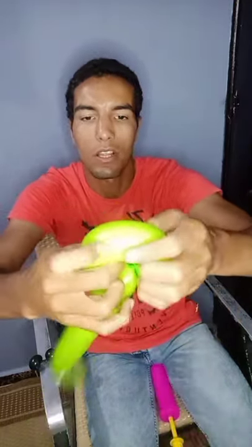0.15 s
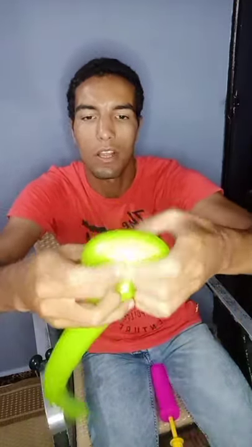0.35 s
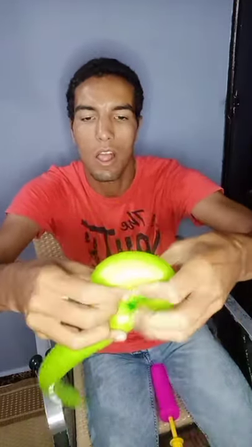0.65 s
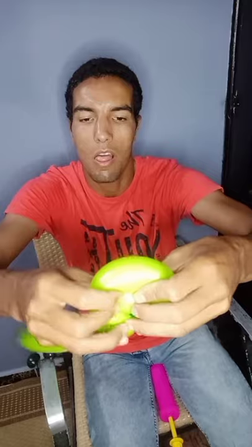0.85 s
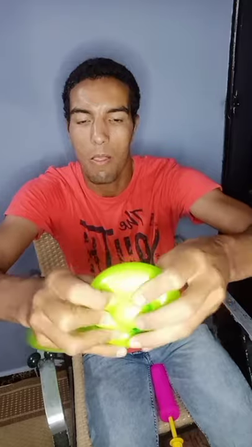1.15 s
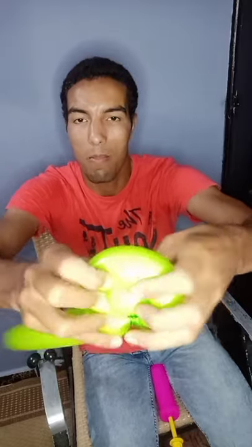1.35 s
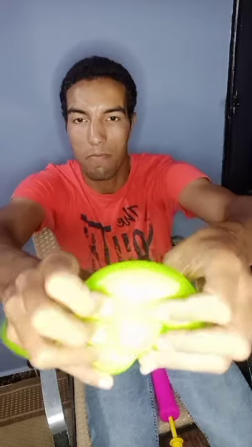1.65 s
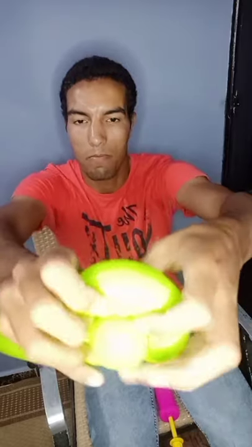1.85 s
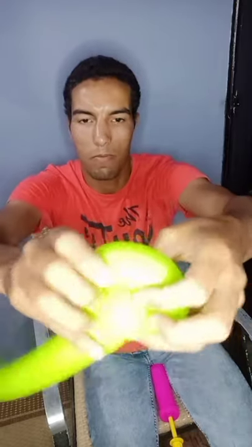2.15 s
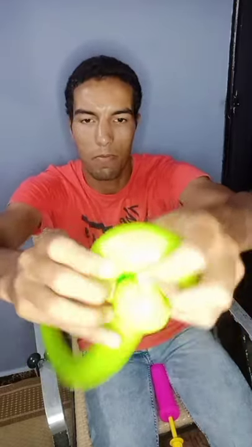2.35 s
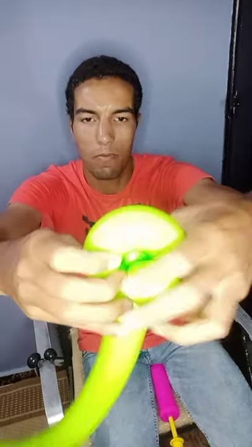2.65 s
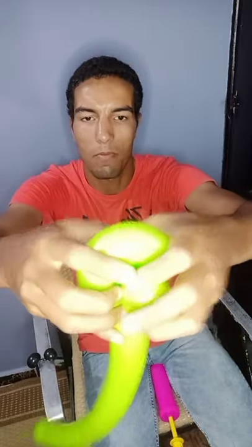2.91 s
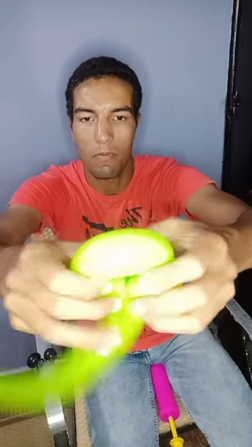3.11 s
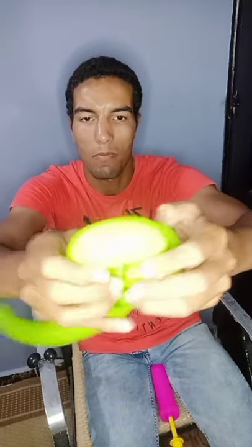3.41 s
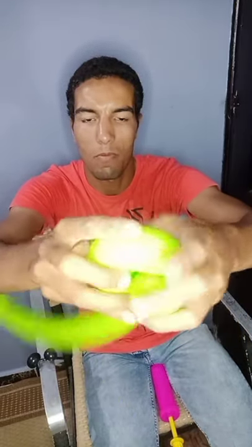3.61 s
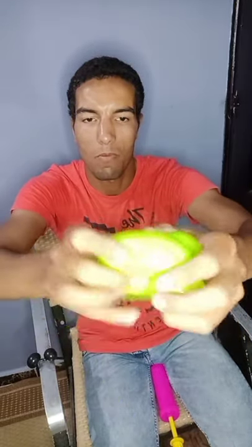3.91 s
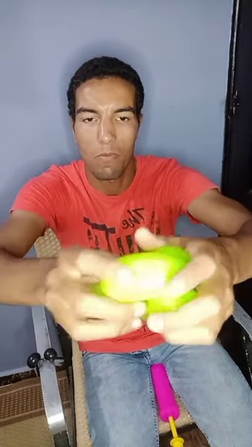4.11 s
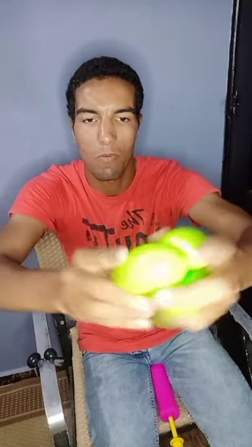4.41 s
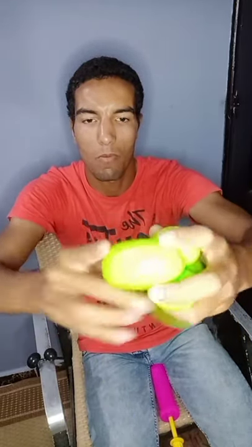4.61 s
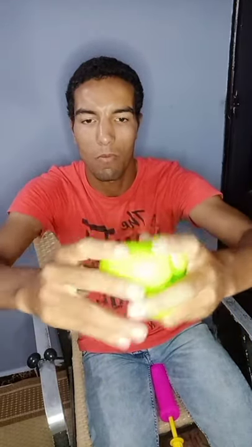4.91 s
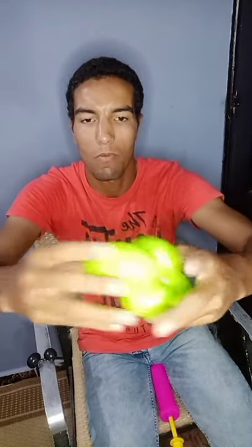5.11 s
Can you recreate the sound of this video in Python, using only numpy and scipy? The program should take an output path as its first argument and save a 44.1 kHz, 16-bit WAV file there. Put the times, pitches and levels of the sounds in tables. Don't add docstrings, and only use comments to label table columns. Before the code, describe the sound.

Hands twist a stretchy latex balloon up close: a quick rising squeak, rubbery rubbing, then sharp snaps, hollow pops and scuffs in a small room.

```python
import sys
import numpy as np
from scipy import signal
from scipy.fft import rfft, irfft, next_fast_len
from scipy.io import wavfile
from scipy.ndimage import map_coordinates

SR = 44100
rng = np.random.default_rng(int(sys.argv[2]) if len(sys.argv) > 2 else 0)


def nominal_scale(level):
    x = np.asarray(level, float) / 20
    return 10 ** x


def inscribe(sig):
    pcm = np.round(np.clip(np.atleast_2d(sig).T, -1, 1) * 32767)
    wavfile.write(sys.argv[1], SR, pcm.astype(np.int16))


N = 231921

# time in seconds, pressure in dB, sliding speed in dB.
HANDS = [(0, -33, -53.5), (.36, -45, -64.5), (.84, -42, -66.5), (1.12, -47, -65), (1.29, -42, -106),
         (1.42, -60, -61.5), (1.52, -54, -49.5), (1.74, -32, -48), (2.12, -42.5, -60), (2.32, -37.5, -46.5),
         (2.6, -35.5, -60.5), (2.94, -40, -60), (3.1, -37.5, -60), (3.55, -36.5, -68), (4.1, -46, -78),
         (4.44, -31.5, -47), (4.66, -40.5, -71), (5.26, -55, -65)]


def along(points, hz):
    f, v = np.transpose(points)
    return np.interp(np.log(hz + 1), np.log(f + 1), v)


def coloured(x, points):
    m = 2 * next_fast_len(N // 2 + 4096)
    gain = nominal_scale(along(points, np.fft.rfftfreq(m, 1 / SR)))
    cepstrum = irfft(np.log(gain + 1e-6), m)
    cepstrum[1:m // 2] *= 2
    cepstrum[m // 2 + 1:] = 0
    return irfft(rfft(x, m) * np.exp(rfft(cepstrum)), m)[..., :N]


def slips(s, db, drum_db, crack_db, drum_hz, skin_hz, luck, size, alike=0):
    index = np.floor(s * SR).astype(int)[:, None] + np.arange(size)
    # Hz, level in dB, seconds to fade by 60 dB
    modes = [(drum_hz, db + drum_db, 4 / drum_hz),
             (skin_hz, db - 4.5, 0.0036 + 0 * s),
             (2100 * np.exp(0.597 * luck[:, 0]), db - 6.5, 0.0032 + 0 * s),
             (5000 * np.exp(0.068 * luck[:, 1]), db + np.minimum(crack_db, 0) - 4.0, 0.0031 + 0 * s)]

    grit = rng.standard_normal((2, len(s), size))
    grit = alike * grit[:, :1] + np.sqrt(1 - alike ** 2) * grit
    bright = nominal_scale(0.59 * np.clip(crack_db, -20, 20) - 20 + 0 * s)[:, None]
    grit = grit + bright * np.diff(grit, n=2, axis=2, prepend=0, append=0)
    grit[1] = .6 * np.roll(grit[0], -1, axis=1) + .8 * grit[1]

    out = np.zeros((2, 2, N))
    for ear, side in enumerate((1, -1)):
        lag = 1e-4 + side * (2.2e-5 + 4.6e-5 * luck[:, 6])
        t = np.maximum(index / SR - (s + lag)[:, None], 0)
        soft = 1 - np.exp(-t / 0.00014)
        ring = 0
        for k, (hz, level_db, t60) in enumerate(modes):
            shade_db = side * 3.21 * np.log2(1 + hz / 900) * (np.tanh(luck[:, 7 + k]) - .15)
            fade = nominal_scale((level_db + shade_db)[:, None] - 60 * t / t60[:, None])
            ring = ring + fade * np.sin(2 * np.pi * hz[:, None] * t)
        ring = ring * np.sign(luck[:, 15:16])
        crack_level_db = db + crack_db + 3 + side * (1.14 * luck[:, 5] - 0.86)
        crack = nominal_scale(crack_level_db[:, None] - 60 * t / 0.0083) * grit[ear]
        for kind, wave in enumerate((ring, crack)):
            out[kind, ear] = np.bincount(index.ravel(), (wave * soft).ravel(), N + SR)[:N]
    return out


def hush():
    # Hz, noise level in dB per Hz.
    hush_colour = [(20, -16), (42, -11.5), (62, -18.5), (130, -10.5), (300, -23), (1000, -16), (2500, -40),
                   (6000, -42), (16000, -38)]
    noise = rng.standard_normal((3, N))
    noise = coloured(noise[0] + 0.36 * noise[1:], hush_colour)
    return nominal_scale(-61) * noise / np.std(noise)


def rub():
    luck = rng.standard_normal((3600, 20))
    clump = np.repeat(rng.uniform(0, N / SR, 1200), 3)
    s = np.clip(clump + .004 * np.abs(luck[:, 16]), 0, N / SR)
    at, pressure_db, speed_db = np.transpose(HANDS)
    db = np.interp(s, at, pressure_db)
    speed_db = np.interp(s, at, speed_db)
    skid_db = speed_db - db
    hiss_db = -9.5 + 0.22 * (skid_db - np.mean(skid_db))
    size_db = -2 + 1.4 * luck[:, 17]
    drum_hz = 720 * np.exp(0.38 * luck[:, 18])
    skin_hz = 2300 * np.exp(0.13 * luck[:, 19])
    return slips(s, db + size_db, -2.5, hiss_db + 0.3 * luck[:, 14], drum_hz, skin_hz, luck, size=224)


def slide():
    at, _, speed_db = np.transpose(HANDS)
    flutter = map_coordinates(rng.standard_normal(N // 300 + 2), [np.arange(N) / 300], order=1)
    noise = rng.standard_normal((3, N))
    level_db = np.interp(np.arange(N) / SR, at, speed_db) + 15.5 + 5.8 * flutter
    return nominal_scale(level_db) * (0.18 * noise[0] + 0.8 * noise[1:])


def scuffs():
    # start in seconds, length in seconds, level in dB,
    # drum level in dB beside that.
    scuff_rows = [(.416, 0.0042, -35.5, 0.5), (.479, 0.0032, -38, -5), (.55, 0.013, -32.5, -1),
                  (.693, 0.023, -43, 5.5), (.765, 0.012, -55, 6), (.795, 0.048, -39, 0.5),
                  (.879, .005, -39, -12), (1.132, 0.021, -33, -12), (1.405, .012, -54, -4),
                  (1.5, 0.06, -25, -5.5), (1.595, 0.0048, -31, 4), (1.624, 0.0085, -20.5, -16),
                  (1.655, 0.013, -18, -14), (1.748, 0.015, -17, -5.5), (1.79, 0.0078, -36, -3),
                  (1.808, 0.0053, -23.5, -7.5), (1.852, 0.019, -29, -4), (1.887, 0.0046, -23, -19),
                  (1.9, 0.0067, -31, -14), (1.954, 0.014, -30, -20), (1.988, 0.008, -41.5, 1),
                  (2.003, 0.0045, -33, -16), (2.031, 0.0028, -47, -13), (2.042, 0.0037, -34.5, -1.5),
                  (2.071, 0.0033, -39, -4), (2.097, 0.0023, -35, -15), (2.125, .022, -26, -7),
                  (2.21, 0.053, -21, -1), (2.266, 0.0058, -19.5, -12), (2.302, 0.0036, -24, -15),
                  (2.33, 0.054, -28.5, -24), (2.415, 0.004, -17.5, -10), (2.46, 0.04, -26.5, -1),
                  (3.032, .012, -20, -12), (3.058, 0.0036, -24, 1), (3.106, 0.0081, -19.5, -3.5),
                  (3.148, .013, -23, -6.5), (3.547, 0.011, -27, -4), (3.65, 0.023, -33, -15),
                  (3.834, .012, -22, -4), (3.945, 0.011, -27.5, -1), (4.05, 0.051, -29, -1),
                  (4.147, 0.0047, -37.5, -18), (4.204, 0.0027, -27, -12), (4.262, 0.0066, -20.5, -11),
                  (4.272, 0.0068, -25, -10), (4.395, 0.048, -23.5, -2), (4.526, 0.0097, -24.5, 4.5),
                  (4.736, 0.0068, -31, -13), (4.789, 0.0062, -31.5, -5)]
    # start in seconds, length in seconds,
    # level in dB, drum level in dB beside that.
    drag_rows = [(.07, 0.061, -29, -7), (.94, 0.072, -33.5, -3), (1.06, .04, -44, -1),
                 (1.23, 0.051, -39, -19), (1.46, 0.036, -44, -6), (1.66, 0.047, -31, -14),
                 (2.965, 0.044, -30.5, -11), (3.014, .045, -29.5, -2), (3.075, 0.065, -31, -1),
                 (3.19, 0.049, -43, -11), (3.405, 0.025, -31, 3), (3.49, .05, -31.5, -2.5),
                 (3.69, 0.085, -36.5, -5), (3.85, 0.055, -32, -14), (3.99, 0.096, -29, -8.5),
                 (4.22, 0.038, -39.5, 7), (4.335, .025, -32, -4), (4.44, 0.054, -35, -3),
                 (4.535, 0.075, -33, -4.5), (4.705, .04, -35.5, -6), (4.85, 0.022, -40, 5.5),
                 (4.92, 0.046, -36, 0), (5.03, .05, -35, -0.5), (5.165, 0.043, -36, -5)]
    rows = np.vstack([np.repeat(scuff_rows, 14, axis=0), np.repeat(drag_rows, 40, axis=0)])
    start, length, db, drum_db = rows.T
    luck = rng.standard_normal((len(start), 20))
    place = rng.uniform(size=len(start))
    crowding_db = 10 * np.log10(1 + 0.023 / length)
    db = db - crowding_db + 3.5 - 4.5 * place + 2.06 * luck[:, 16]
    drum_hz = 740 * np.exp(0.31 * luck[:, 17])
    skin_hz = 2350 * np.exp(.14 * luck[:, 18])
    return slips(start + length * place, db, drum_db, -6 + 0 * db, drum_hz, skin_hz, luck, size=224)


def run_of(at, rate, db, drum_db, drum_hz, wall_hz):
    grid = np.linspace(at[0], at[-1], num=200)
    done = np.cumsum(np.interp(grid, at, rate)) * (grid[1] - grid[0])
    jitter = rng.standard_normal((64, 16))
    spot = rng.standard_normal(16)
    count = np.arange(64)
    s = np.interp(count + 0.045 * jitter[:, 0], done - done[0], grid)
    db, drum_db, drum_hz = [np.interp(s, at, c + 0 * at) for c in (db, drum_db, drum_hz)]
    db = np.where(count <= done[-1], db, -200)
    luck = 1.34 * spot + 0.15 * jitter
    luck[:, 15] = 1
    luck[:, 6] = 0.5 * np.tanh(luck[:, 6])
    luck[:, 0] *= .15
    skin_hz = wall_hz + 40 * luck[:, 2]
    return slips(s, db + 0.64 * jitter[:, 1], drum_db, -8.5, drum_hz, skin_hz, luck, size=320, alike=0.91)


def squeaks():
    # time in seconds, slips per second, level in dB,
    # drum level in dB beside that, drum tone in Hz.
    glides = [
        [(.0738, 148, -22.5, 7.5, 680), (.09, 166, -23, 7, 663), (.1, 222, -21.5, 5.5, 664),
         (.111, 297, -14, 1, 760), (.119, 390, -9.5, -0.5, 880), (.129, 455, -7.5, -1, 970),
         (.135, 480, -11, -7, 1200), (.141, 510, -17, -8, 1250)],
        [(.967, 376, -21, -2, 900), (.985, 460, -22, -9, 945), (1.007, 285, -25.5, 6.5, 900)],
        [(2.491, 560, -24, 4, 620), (2.498, 655, -11, 3, 680), (2.505, 663, -13, 2, 670),
         (2.513, 655, -24, 0, 655), (2.575, 655, -44, 0, 650)],
        [(2.771, 510, -22, -1, 1050), (2.785, 525, -22.5, 3, 1100), (2.8, 540, -21, 0, 1100),
         (2.812, 460, -20.5, 1, 980), (2.832, 270, -26, -2, 900)],
        [(2.952, 760, -12.5, -14, 900), (2.961, 876, -6.5, -10, 860), (2.966, 343, -24, -16, 820)],
    ]
    glide_walls = [2600, 2650, 1980, 3000, 2520]
    # start in seconds, length in seconds, slips per second,
    # peak in dB, drum tone in Hz.
    wall_runs = [
        (1.22, 0.024, 1330, -37.5, 1280),
        (3.431, 0.013, 415, -14.5, 820),
        (3.474, 0.016, 260, -22, 290),
        (4.84, 0.011, 510, -28, 1050),
        (4.916, 0.027, 300, -29.5, 1010),
    ]
    # start in seconds, length in seconds, slips per second,
    # peak in dB, drum tone in Hz.
    finger_runs = [
        (.891, 0.025, 241.6, -20.5, 856),
        (.945, 0.013, 401, -26, 820),
        (1.204, 0.011, 484.6, -18, 950),
        (1.632, 0.033, 330, -32, 1200),
        (3.007, 0.0079, 762, -13.5, 790),
        (3.452, 0.0143, 485, -15, 980),
        (3.69, 0.061, 129.2, -29, 710),
        (4.985, 0.05, 402.4, -21, 880),
    ]
    out = sum(run_of(*np.transpose(run), wall_hz) for run, wall_hz in zip(glides, glide_walls))
    for runs, drum_db in ((wall_runs, 5), (finger_runs, -8.5)):
        for start, length, rate, db, drum_hz in runs:
            at = start + length * np.array([0, .55, 1])
            rates = rate * np.array([.92, 1, 1])
            swell_db = db - np.array([3.5, 0, 4])
            wall_hz = rate * np.round(2180 / rate)
            out = out + run_of(at, rates, swell_db, drum_db, drum_hz, wall_hz)
    return out


def rings():
    # start in seconds, peak in dB, tone in Hz, seconds to fade by 60 dB.
    ring_rows = [(2.496, -19.5, 1970, 0.11), (2.497, -27, 1290, 0.14), (2.52, -32, 1950, .1),
                 (2.553, -39, 1970, 0.13), (2.497, -33, 2630, .04), (2.497, -36, 3950, .04),
                 (2.497, -31, 4600, .05), (2.515, -24, 660, .12), (2.955, -23, 1150, .03),
                 (4.9775, -22, 2650, .015), (1.8, -19, 2220, 0.016), (1.4538, -14, 3150, 0.01),
                 (3.1792, -20, 4880, 0.006), (5.164, -27.5, 490, 0.077), (0.13, -27, 2500, .05),
                 (.126, -24, 840, 0.059), (4.6, -31, 1800, .12), (2.775, -32, 1200, .12)]
    out = np.zeros(N + SR)
    t = np.arange(SR // 5) / SR
    for s, db, hz, t60 in ring_rows:
        swell = 1 - np.exp(-25 * t / t60)
        out[round(s * SR):][:len(t)] += nominal_scale(db - 60 * t / t60) * swell * np.sin(2 * np.pi * hz * t)
    return out[:N]


def thumps():
    # start in seconds, peak in dB, tone in Hz.
    clear = [(0.177, -42, 132), (0.379, -37.5, 143), (2.25, -41.5, 300), (1.813, -38.5, 150),
             (2.198, -34.5, 204), (2.792, -50, 83.4), (2.8, -30, 142), (2.923, -65, 203), (3.095, -38, 134),
             (3.237, -41, 152), (3.449, -55, 143), (3.834, -31.5, 135), (4.372, -39, 193),
             (4.981, -29, 160), (5.153, -43, 147), (.345, -45.5, 262), (.49, -51, 295), (.7, -52, 323),
             (3.55, -43, 287), (4.065, -44.5, 271), (.37, -30, 70), (.53, -38, 140), (1.63, -41, 127),
             (2.2, -35, 100), (2.84, -26, 75), (.695, -51, 240), (3.03, -40, 130), (5.2, -30, 90),
             (5.166, -45, 490)]
    luck = rng.standard_normal((130, 3))
    faint_s = rng.uniform(0, N / SR, len(luck))
    pressure_db = np.interp(faint_s, *np.transpose(HANDS)[:2])
    faint_db = -58 + 0.41 * (pressure_db + 42) + 4 * luck[:, 0]
    faint = np.transpose([faint_s, faint_db, 190 * np.exp(.5 * luck[:, 1])])
    out = np.zeros(N + SR)
    t = np.arange(SR // 10) / SR
    swell = 1 - np.exp(-t / 0.0092)
    for s, db, hz in [*clear, *faint]:
        out[round(s * SR):][:len(t)] += nominal_scale(db + 20.0 - 60 * t / 0.052) * swell * np.sin(2 * np.pi * hz * t)
    return out[:N]


def snaps():
    # time in seconds, peak in dB, drum level in dB
    # beside the peak, drum tone in Hz, skin tone in Hz.
    breaks = [(1.4542, -6.5, -15, 775, 2750), (1.6302, -6, -34, 1280, 1750), (1.7515, -13, -7.5, 855, 2230),
              (2.1574, -5, -17, 810, 2640), (2.2044, -11.5, -1, 630, 2070), (2.3192, -8, -44, 1260, 2400),
              (2.419, -14.5, -5.5, 810, 2260), (2.933, -14.5, -1, 513, 2350), (3.0224, -16, -3, 1120, 2320),
              (3.106, -20.5, -5, 820, 2170), (3.2724, -11.5, -18, 930, 3140), (3.4007, -11, -5, 910, 2630),
              (3.4279, -14, -5, 800, 2700), (3.8155, -2.5, -22.5, 517, 2800),
              (3.9223, -11, -18, 1300, 2760), (4.0428, -16, -7.5, 880, 2280), (4.1859, -13, -6, 895, 2430),
              (4.2924, -13, -2.5, 417, 2520), (4.3236, -8, -11, 1160, 3070), (4.362, -14.5, 4, 804, 2550),
              (4.3838, -6, -5, 430, 3050), (4.3886, -8, -0.3, 1040, 3000), (4.7025, -15, -10.5, 1080, 2540),
              (4.9771, -7, -3, 815, 2320)]
    # time in seconds, peak in dB, drum tone in Hz,
    # skin tone in Hz.
    pops = [(0.2856, -20.5, 394, 1980), (0.3845, -27, 820, 2400), (.5209, -32.5, 586, 1460),
            (0.642, -33, 378, 2140), (1.1457, -27, 790, 2260), (1.1985, -24, 860, 2480),
            (1.5985, -22, 754, 2520), (1.7264, -27, 606, 2670), (1.948, -30, 754, 1640),
            (2.7284, -24.5, 610, 2270), (2.7346, -22, 557, 2260), (2.744, -21.5, 543, 2210),
            (2.821, -20.5, 510, 2590), (2.853, -22.5, 920, 2120), (2.8827, -17, 520, 2850),
            (3.0347, -24, 1100, 2790), (3.0985, -19.5, 1280, 2120), (3.1504, -24, 1200, 2770),
            (3.329, -19, 750, 2890), (3.4813, -21, 805, 1740), (3.6773, -24.5, 1440, 2450),
            (3.838, -24.5, 800, 2440), (4.066, -17.5, 750, 2650), (4.3277, -10, 1070, 1980),
            (4.3327, -17, 1150, 2000), (4.4903, -16, 755, 1490), (4.5151, -25, 576, 2800),
            (4.5320, -14.5, 623, 2320), (4.8355, -20.5, 1020, 1600), (5.1639, -17, 560, 2830)]
    # time in seconds, peak in dB, skin tone in Hz.
    ticks = [(0.5619, -23, 2570), (1.1851, -16, 2430), (1.4298, -33.5, 2300), (1.6483, -20, 2870),
             (1.7732, -16.5, 2650), (2.0585, -35, 2600), (2.1221, -13.5, 1860), (2.357, -29, 2280),
             (2.3822, -24, 2350), (2.5754, -26, 2080), (2.6304, -27, 1930), (2.6811, -36, 2380),
             (3.0507, -27, 2480), (3.0696, -18.5, 2140), (3.1761, -22, 2710), (3.4786, -20, 2560),
             (3.6305, -29, 2770), (3.9815, -22, 2480), (4.0253, -16, 2340), (4.218, -21, 2260),
             (4.561, -23.5, 1930), (4.5864, -22, 1830), (4.6544, -23.5, 2650), (4.934, -24.5, 2180),
             (5.1537, -18, 2100), (3.8083, -26, 1690), (1.299, -31, 1980), (4.61, -27.5, 2190)]
    # time in seconds, peak in dB, crack level in dB
    # beside the peak, skin tone in Hz.
    tears = [(0.9165, -21, 0, 2940), (1.014, -24, 3, 2970), (1.0555, -17.5, -3.5, 2180),
             (1.1809, -19.5, 1.5, 1810), (1.227, -30, 7, 2400), (1.536, -23.5, -9, 2670),
             (1.5633, -24, -34, 2590), (1.5799, -16.5, 0.5, 2720), (1.659, -23, 7, 2070),
             (1.671, -23, 1, 2340), (1.82, -27.5, -6, 1900), (1.8743, -24.5, -5, 2700),
             (1.8911, -27.5, 10.5, 2180), (2.135, -34, 0, 2480), (3.1794, -13.5, -3.5, 2720),
             (3.3045, -16, -1.5, 2110), (3.8442, -23.5, 3, 2150), (3.999, -46, 19, 2750),
             (4.2087, -11, -6, 2360), (4.2662, -15.5, 5, 2530), (4.817, -24, -1, 2780),
             (2.202, -6, -4.5, 2260), (2.175, -34, 7, 2500)]
    segment_hz = 820
    rows = [(s, db, drum_db, -8, drum_hz, skin_hz) for s, db, drum_db, drum_hz, skin_hz in breaks]
    rows += [(s, db, -2, -8.5, drum_hz, skin_hz) for s, db, drum_hz, skin_hz in pops]
    rows += [(s, db, -31, -7.5, segment_hz, skin_hz) for s, db, skin_hz in ticks]
    rows += [(s, db, -8.5, crack_db, segment_hz, skin_hz) for s, db, crack_db, skin_hz in tears]
    s, db, drum_db, crack_db, drum_hz, skin_hz = np.repeat(np.array(rows), 3, axis=0).T
    luck = np.repeat(rng.standard_normal((len(rows), 16)), 3, axis=0)
    own = rng.standard_normal((len(s), 16))
    stage = np.arange(len(s)) % 3
    luck[:, 6] = .5 * np.tanh(luck[:, 6])
    own[:, 6] *= 0.41
    luck[:, 0] = .6 * np.tanh(luck[:, 0])
    own[:, 0] *= .7
    s = s + np.array([-.0015, .0001, .0015])[stage] * np.exp(0.294 * own[:, 0])
    db = db + np.array([-13, 4, -7])[stage] + 3 * own[:, 1] * (stage != 1)
    return slips(s, db, drum_db, crack_db, drum_hz, skin_hz, 0.847 * luck + .5 * own, size=384)


def zips():
    # start in seconds, length in seconds, level in dB.
    skids = [
        (1.888, .008, -36.5),
        (1.8, 0.065, -66),
        (0.91, 0.11, -57),
        (1.055, .005, -54),
        (2.77, 0.077, -56),
        (3.27, .005, -54),
        (3.55, .05, -69),
        (1.8, .04, -64),
    ]
    # Hz, level in dB per Hz.
    zip_colour = [(2000, -40), (6000, -8), (9000, 4), (14000, 10), (16000, -6)]
    t = np.arange(N) / SR
    noise = rng.standard_normal((3, N))
    swell = sum(nominal_scale(db) * np.sin(np.pi * np.clip((t - s) / length, 0, 1)) for s, length, db in skids)
    return coloured(swell * (0.79 * noise[0] + 0.88 * noise[1:]), zip_colour)


def room(x):
    # Hz, seconds for the room to fade by 60 dB.
    fade_times = [(200, 0.22), (600, 0.26), (2000, 0.26), (5000, 0.24), (12000, 0.21)]
    out = np.zeros((2, N + 2 * SR))
    step = SR // 4
    for start in range(0, N, step):
        hz, t, z = signal.stft(rng.standard_normal((2, SR // 2)), SR, nperseg=256)
        apart = np.clip(hz / 1200, .8, .95)[:, None]
        z[1] = np.sqrt(1 - apart ** 2) * z[0] + apart * z[1]
        fade = nominal_scale(-60 * t / along(fade_times, hz)[:, None])
        tail = signal.istft(z * fade, SR, nperseg=256)[1]
        tail = tail / np.linalg.norm(tail[0])
        wet = signal.fftconvolve(x[None, start:start + step], tail, axes=1)
        out[:, start + 130:start + 130 + wet.shape[1]] += wet
    return out[:, :N]


def scene():
    # Hz, level in dB per Hz.
    crack_colour = [(600, -54.5), (1500, -2.5), (3000, -8.5), (5000, -3), (6500, -11), (8500, -15),
                    (11000, -13.5), (14000, -15), (16500, -40.5)]
    ring, crack = rub() + scuffs() + squeaks() + snaps()
    balloon = ring + coloured(crack + slide(), crack_colour) + rings() + thumps()
    return balloon + nominal_scale(-5.5) * room(balloon.mean(0)) + zips()


def top_cut(x):
    return signal.sosfilt(signal.butter(12, 16670, fs=SR, output="sos"), x)


def record(dry):
    # Hz, microphone gain in dB.
    phone_colour = [(45, -40), (100, -22), (250, -7), (500, 0), (1500, 7.5), (2400, 9), (3800, 7),
                    (5000, 7.5), (7000, 2.5), (10000, -4), (13800, 1.5), (16000, 21)]
    x = coloured(dry, phone_colour)
    x = x / (1 + np.abs(x / .97) ** 6) ** (1 / 6)
    x = coloured(x + hush(), [(15600, 0), (16200, -16), (16800, -50)]) + .001
    return top_cut(x)


dry = scene()
out = record(dry)
inscribe(out)
```